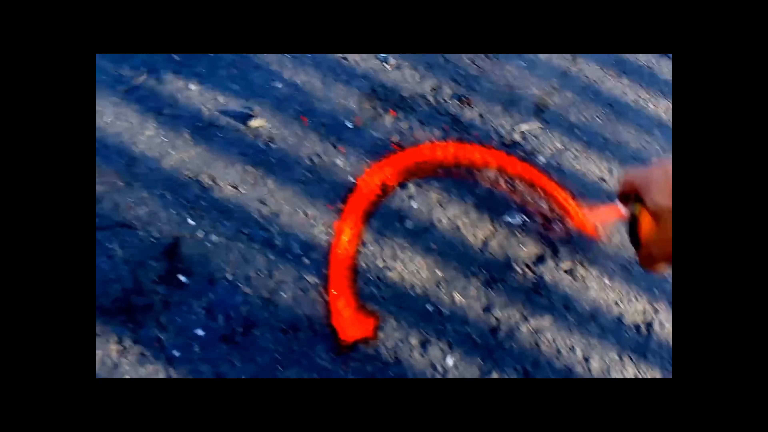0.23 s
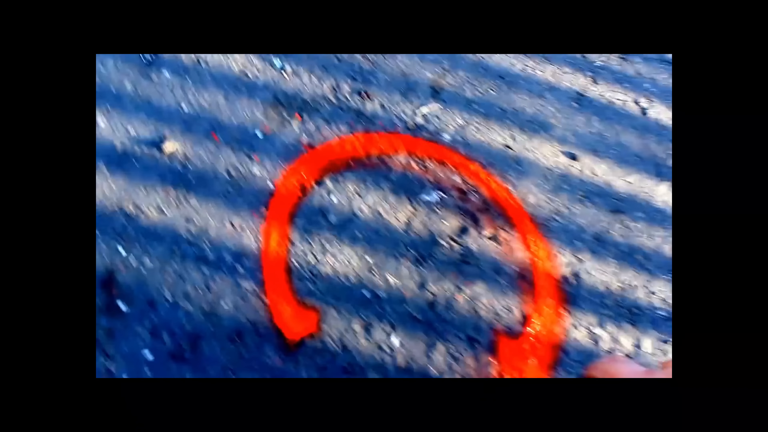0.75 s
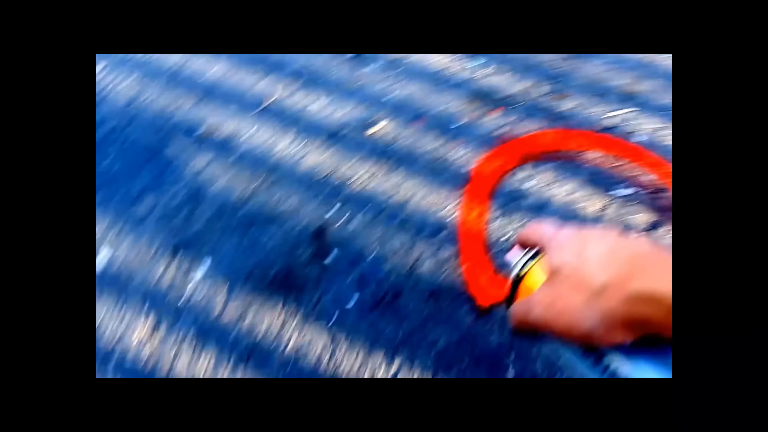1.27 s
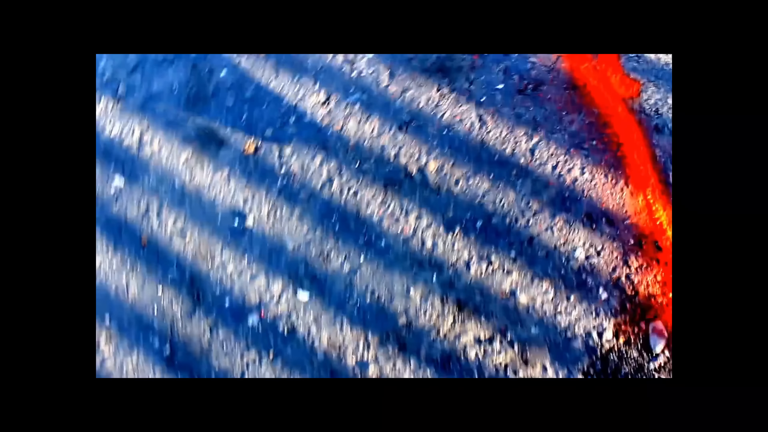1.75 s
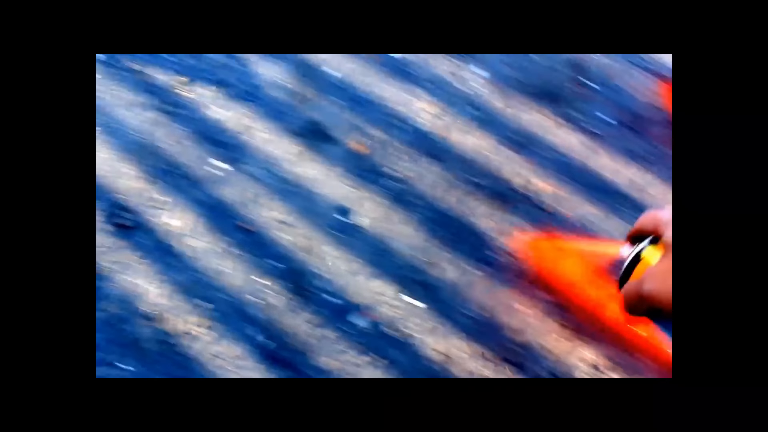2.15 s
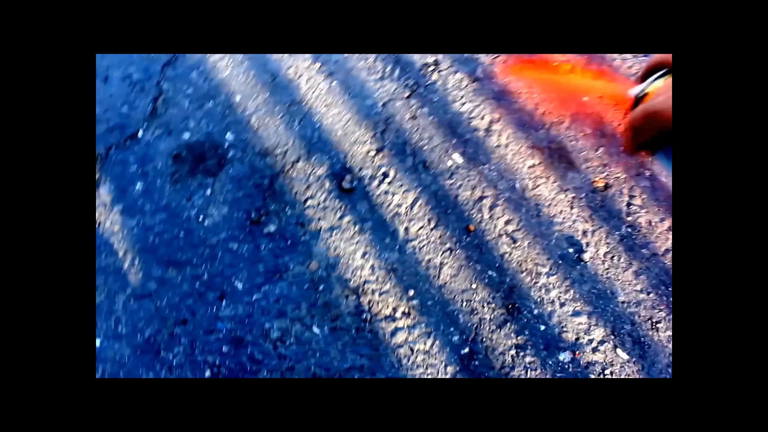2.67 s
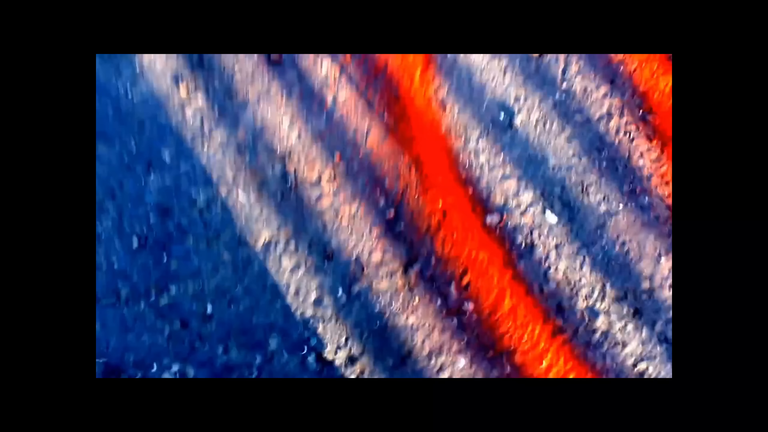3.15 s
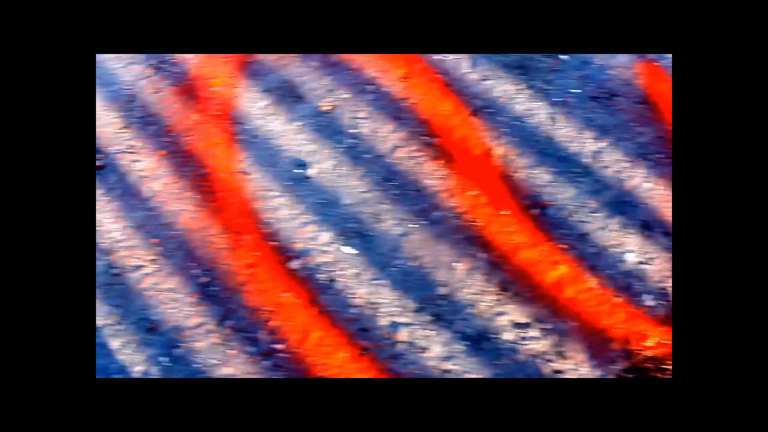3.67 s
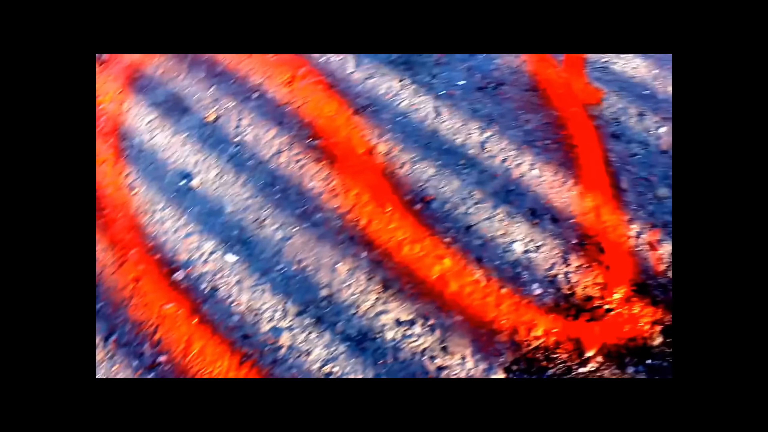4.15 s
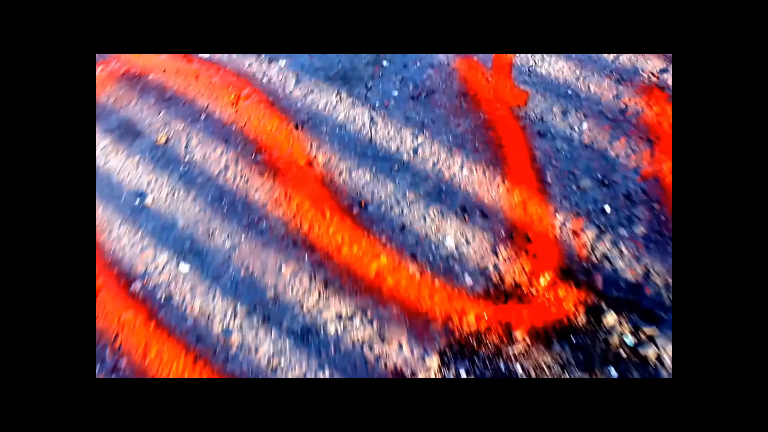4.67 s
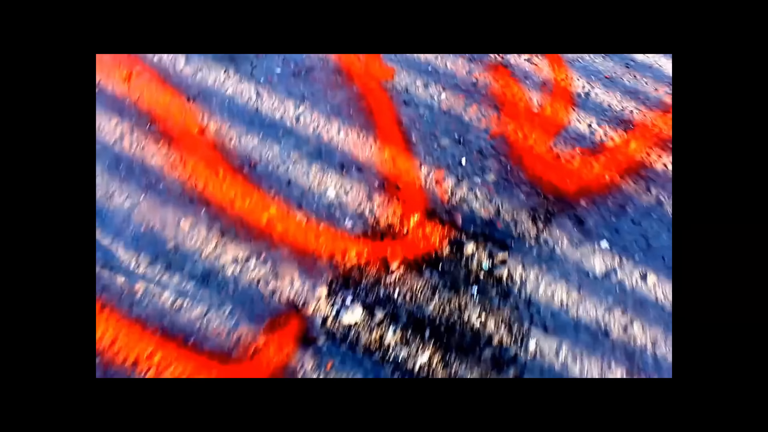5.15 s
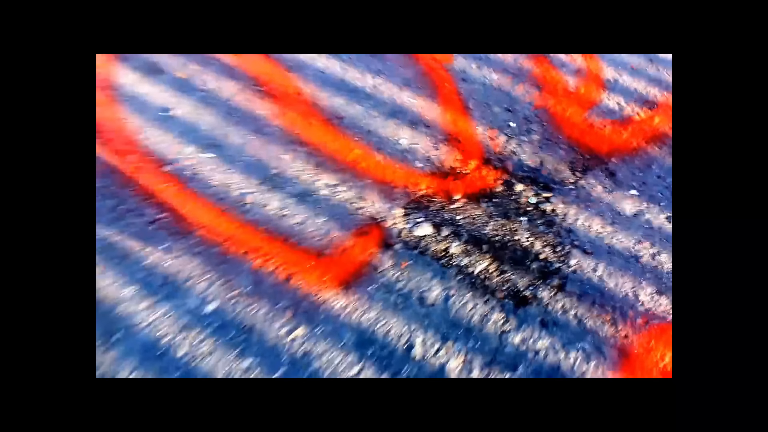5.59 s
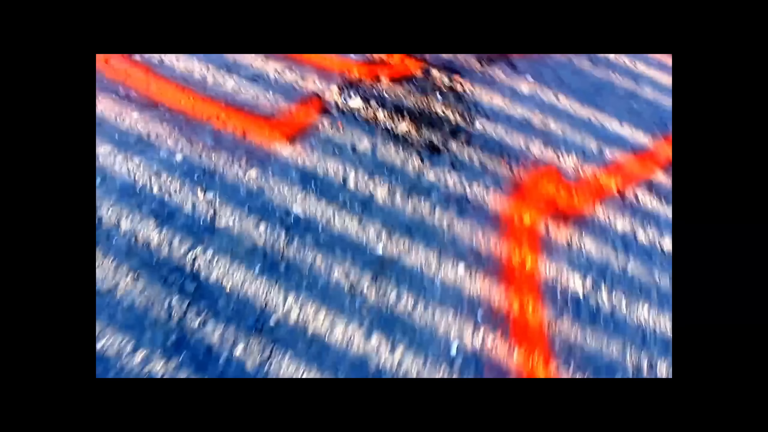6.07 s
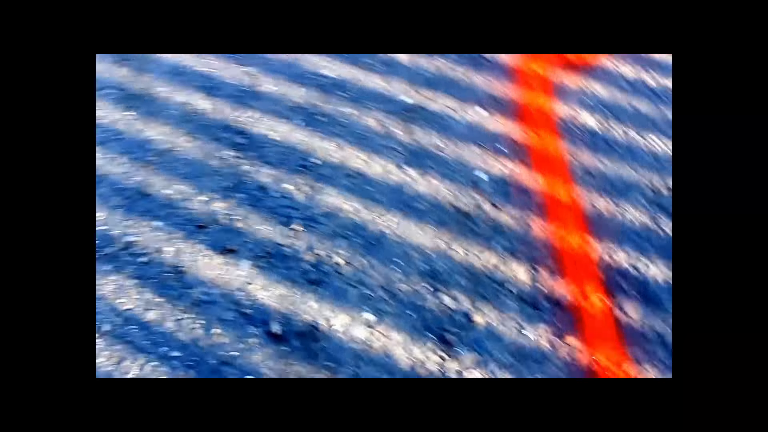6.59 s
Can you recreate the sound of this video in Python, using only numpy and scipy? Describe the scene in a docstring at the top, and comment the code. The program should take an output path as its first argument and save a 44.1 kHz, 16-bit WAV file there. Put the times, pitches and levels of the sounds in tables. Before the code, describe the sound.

An aerosol can hisses in four long bursts close to asphalt, with finger rubs, sharp ticks and hard clacks between them outdoors.

```python
"""An aerosol can sprays paint lines on asphalt in four strokes, outdoors: noise jets, gated by a valve, combed by the ground.
The first is already hissing and ends with three tiny spits; a soft airy hiss is strongest near 0.75 s, then fingers
rub and tick on the camera body. The second runs from 1.3 to 3.3 s, the third from 3.8 to 5.2 s with three hard clacks
(ringing modes) near 4.75 s. The last fades in at 5.4 s under the densest rubs and ticks (stick-slip noise and touches
through a body response), with a clack at 6.7 s. Behind it all a murmur wavers, with faint gusts near 1 and 4 s."""
import sys
import numpy as np
from scipy import signal
from scipy.fft import rfft, irfft
from scipy.io import wavfile
from scipy.ndimage import map_coordinates

SR = 44100
rng = np.random.default_rng(int(sys.argv[2]) if len(sys.argv) > 2 else 0)


def put_to_file(sound):
    """Save the sound as 16-bit audio at rate SR, in the file named by the first command-line argument."""
    columns = np.atleast_2d(sound).T  # one column per channel
    safe = np.clip(columns, -1, 1)
    whole_steps = np.round(safe * 32767)
    wavfile.write(sys.argv[1], SR, whole_steps.astype(np.int16))


N = 301203
TIME = np.arange(N) / SR


def amp(db):
    """Decibels to gain."""
    return 10 ** (np.asarray(db) / 20)


def unit(x):
    """Scales to an rms of one."""
    return x / np.sqrt(np.mean(x ** 2) + 1e-20)


def spectrum(points, hz):
    """Reads a (Hz, dB) table on a log-frequency axis."""
    table_hz, table_db = np.transpose(points)
    return np.interp(np.log(hz + 1), np.log(table_hz + 1), table_db)


def curves(rows, t=TIME):
    """Reads every column of a timed table at the times t."""
    row_s, *columns = np.transpose(rows)
    return [np.interp(t, row_s, column) for column in columns]


def add(mix, start_s, sound):
    """Mixes a sound in at start_s."""
    part = mix[max(round(start_s * SR), 0):][:len(sound)]
    part += sound[:len(part)]


def noise(points):
    """Steady noise of a given colour; rms one."""
    gain = amp(spectrum(points, np.fft.rfftfreq(N, 1 / SR)))
    return unit(irfft(rfft(rng.standard_normal(N)) * gain, N))


def flutter(hz):
    """Random wavering, up to about hz times a second; rms one."""
    rolloff = 1 + (np.fft.rfftfreq(N, 1 / SR) / hz) ** 2
    return unit(irfft(rfft(rng.standard_normal(N)) / rolloff, N))


def response(points, tilt_db=0, bass_db=0, size=2048):
    """Minimum-phase impulse response of a colour, tilted in dB per octave from 200 to 6000 Hz, bass shelved."""
    hz = abs(np.fft.fftfreq(size, 1 / SR))
    tilt = tilt_db * np.log2(np.clip(hz, 200, 6000))
    bass = bass_db / (1 + (hz / 480) ** 4)
    log_gain = np.log(amp(spectrum(points, hz) + tilt + bass))
    return np.fft.ifft(np.exp(np.conj(signal.hilbert(log_gain)))).real[:size // 2]


def through(drive, ring):
    """Lets a force ring a body, keeping its power."""
    return signal.fftconvolve(drive, ring / np.linalg.norm(ring))


def contact(grit, grit_s, size=600):
    """A sharp touch followed by a few milliseconds of gritty chatter."""
    t = np.arange(size) / SR
    return (t == 0) + grit * rng.standard_normal(size) * np.exp(-t / grit_s)


# Street's low murmur. Each row: frequency in Hz, relative density in dB per Hz.
MURMUR_COLOUR = [(20, -38), (45, -30), (95, -1), (145, -2.5), (174, 3), (205, -1.5), (380, 0), (700, -0.5),
                 (1100, -0.5), (1550, -5), (2400, -4.5), (3300, -10), (6000, -15), (16000, -66)]
MURMUR_DB = -40.5  # before its waver


def street(waver_db=2.34, waver_hz=6):
    """Distant outdoor murmur: low coloured noise, gently wavering."""
    return amp(MURMUR_DB + waver_db * flutter(waver_hz)) * noise(MURMUR_COLOUR)


# Soft airy hiss. Each row: frequency in Hz, relative density in dB per Hz.
AIRY_COLOUR = [(1000, -7.5), (2300, 1), (3300, -3.5), (4400, 4.5), (6000, 1), (7600, -3), (10000, -8),
               (11500, -13.5), (13000, -23), (16000, -34)]
# Its level over time. Each row: time in seconds, level in dB before its waver.
AIRY_LEVEL_DB = [(0, -37.5), (.75, -32.5), (1.15, -36), (3.4, -44), (5.3, -47.5), (6.8, -41.5)]


def airy_hiss(waver_db=1.5, waver_hz=3.7):
    """Soft airy hiss heard in the pauses, strongest near 0.75 s: coloured noise, gently wavering."""
    level_db, = curves(AIRY_LEVEL_DB)
    return amp(level_db + waver_db * flutter(waver_hz)) * noise(AIRY_COLOUR)


# Air moving past the microphone. Each row: frequency in Hz, relative density in dB per Hz.
WIND_COLOUR = [(10, 7.5), (30, -32), (55, 5), (90, -1), (200, -14), (1000, -70)]
# Gusts. Each row: centre in seconds, time from centre to 1/e in seconds, level in dB before its lumps.
GUSTS = [(1.07, .2, -50), (4.1, .5, -64)]


def wind(lump_db=4, lump_hz=7):
    """Faint, lumpy gusts rumble at the microphone."""
    gusts = sum(amp(db) * np.exp(-((TIME - centre_s) / half_s) ** 2) for centre_s, half_s, db in GUSTS)
    return gusts * amp(lump_db * flutter(lump_hz)) * noise(WIND_COLOUR)


# Hard clacks. Each row: start in seconds, peak in dB.
CLACKS = [(4.74, -10), (4.752, -4), (4.764, 3.5), (6.733, -11.5)]
# Their ring. Each row: frequency in Hz, start level in dB before the radiation filter, t60 in seconds.
CLACK_MODES = [(710, 2, 0.024), (1040, -10, .02), (1350, -23, .015), (1680, -7, 0.021), (2140, -7, .012),
               (2490, 10.5, 0.012), (2770, 2.5, 0.013), (3010, -16, 0.013), (2980, -11, 0.022),
               (3600, -28, 0.0089), (4560, 6, 0.018), (4800, -31, .016), (6853, -19, .016)]


def clacks(low_cut_hz=450, top_hz=6000, crack=0.11):
    """Short gritty blows: a dry crack plus quickly dying modes of something too small to radiate bass."""
    out, t = np.zeros(N), np.arange(SR // 10) / SR
    modes = sum(amp(db - 60 * t / t60_s) * np.cos(2 * np.pi * hz * t) for hz, db, t60_s in CLACK_MODES)
    radiation = signal.butter(2, [low_cut_hz, top_hz], "bandpass", fs=SR, output="sos")
    dry_crack = unit(signal.sosfilt(radiation, 1. * (t == 0)))
    ring = unit(signal.sosfilt(radiation, modes)) + crack * dry_crack
    for start_s, peak_db in CLACKS:
        clack = signal.fftconvolve(contact(grit=0.12, grit_s=0.0027), ring)
        add(out, start_s, amp(peak_db) * clack / abs(clack).max())
    return out


def friction(length_s, slips_per_s, smooth):
    """Uneven stick-slip jerks over a smooth drag; rms one."""
    n = max(round(length_s * SR), 16)
    chance, size, drag = rng.random((n, 3)).T
    slips = (chance < slips_per_s / SR) * (size - .5) * np.sqrt(SR / slips_per_s)
    return unit((slips + smooth * (drag - .5)) * signal.windows.tukey(n, .1))


# Camera body's response. Each row: frequency in Hz, gain in dB.
BODY = [(40, -36), (130, -22.5), (210, -8), (280, 0.5), (365, 3.5), (520, -2), (670, 0), (800, 4.5),
        (1300, -3), (1640, -2.5), (2000, -4.5), (4400, -11), (6000, -16), (16000, -38)]
LANDING_BASS_DB, LEAVING_BASS_DB = 8.5, -6.5  # a finger lands with a fleshy thump and leaves thinner
UNEVEN_DB, UNEVEN_S = 2, .006  # finger pressure wavers this much, this quickly
LIFT_S = .008


def rub(length_s, swell_s, db, fade_db, tilt_db, bass_db):
    """A finger presses in unevenly, eases off and lifts; the body's sound loses bass along the way."""
    drive = friction(length_s, slips_per_s=450, smooth=0.94)
    t = np.arange(len(drive)) / SR
    waver = rng.standard_normal(size=64)
    pressure_db = UNEVEN_DB * np.interp(t / UNEVEN_S, np.arange(len(waver)), waver)
    drive = unit(drive * amp(pressure_db))
    eased = np.clip((t - swell_s) / max(length_s - swell_s, 1 / SR), 0, 1)
    press = np.minimum(t / swell_s, 1)
    lift = np.minimum((length_s - t) / LIFT_S, 1)
    drive = drive * press * lift * amp(db - fade_db * eased ** 1.6)
    landing = response(BODY, tilt_db, bass_db + LANDING_BASS_DB)
    leaving = response(BODY, tilt_db, bass_db + LEAVING_BASS_DB)
    return through(drive * (1 - t / length_s), landing) + through(drive * t / length_s, leaving)


# Finger rubs. Each row: start in seconds, length in seconds, swell time in seconds,
# level in dB before swell and fade, fade in dB, brightness in dB per octave,
# bass in dB before landing and leaving shifts.
RUBS = [(0.811, 0.053, .008, -33.5, -1, 2, 12), (0.882, 0.13, 0.029, -17.5, 10.5, -1.5, -3.5),
        (1.412, 0.034, .004, -30.5, 8, -.5, 7), (1.472, 0.019, 0.0037, -32, -4, 0, 1),
        (1.553, 0.096, 0.026, -22.5, 7.5, -1, 7), (3.072, 0.1135, 0.054, -31, 1, -5, -1),
        (4.731, 0.056, .003, -27, 3, 2, 1), (4.818, 0.026, 0.01, -16, -1, -1.5, -10),
        (4.844, .11, 0.0027, -22, 6, -0.5, -3.5), (5.186, .088, 0.017, -22, 4.5, -8.5, -13.5),
        (5.309, 0.099, 0.0044, -20.5, 7, -6, -6), (5.725, 0.018, 0.0027, -20, 21, -4.5, 21),
        (5.831, 0.054, .002, -17, 7, 3, 12), (5.876, 0.066, 0.0018, -18, 7, 1, 6.5),
        (6.089, 0.045, 0.011, -28, 5, -9, -7), (6.178, 0.08, .003, -19.5, 9.5, -1, 3),
        (6.671, 0.11, .004, -26, 9.5, -1.5, -20)]
# Thin scratches. Each row: start in seconds, length in seconds, level in dB.
SCRATCHES = [(4.827, 0.014, -30), (5.338, 0.0024, -26.5), (5.356, 0.034, -39), (5.368, 0.0068, -21.5),
             (5.377, 0.0033, -21)]
# Their colour. Each row: frequency in Hz, relative gain in dB.
SCRATCH_COLOUR = [(1000, -12), (3500, -4), (5800, 1.5), (7800, 5.5), (9200, -1.5), (10500, -15),
                  (16000, -25)]
# Single ticks and knocks. Each row: start in seconds, peak in dB, brightness in dB per octave.
TICKS = [(.827, -12.5, 13), (0.961, -13, -1.5), (1.4164, -6, 1), (1.559, -19, -8), (3.613, -25, 1),
         (4.809, -13, -5), (4.859, -15, -10), (4.908, -6.5, 6), (4.9407, -7.5, -1.5), (5.341, -22, 0),
         (5.729, -8, 1), (5.833, 2.5, 2), (5.85, -3, 0), (5.862, -6, 0.5), (5.879, -9, -4.5),
         (6.182, -10, -8), (6.673, -8, 0), (6.6902, 4, 6), (6.699, -6.5, 3.5), (6.713, -7, 3)]


def fingers():
    """Rubs and scratches (stick-slip friction) and ticks (single touches) on the camera body."""
    out = np.zeros(N)
    for start_s, *shape in RUBS:
        add(out, start_s, rub(*shape))
    for start_s, length_s, db in SCRATCHES:
        drive = friction(length_s, slips_per_s=4100, smooth=.8)
        add(out, start_s, amp(db) * through(drive, response(SCRATCH_COLOUR)))
    for start_s, peak_db, tilt_db in TICKS:
        tick = signal.fftconvolve(contact(grit=0.16, grit_s=0.0011), response(BODY, tilt_db))
        add(out, start_s, -amp(peak_db) * tick / abs(tick).max())
    return out


# Drops spat as the valve closes. Each row: start in seconds, peak in dB before the ground reflections.
SPITS = [(.6814, -20), (.7042, -18), (0.7162, -13.5)]
# Jet's hiss, also the spits' colour. Each row: frequency in Hz, relative density in dB per Hz.
HISS_COLOUR = [(500, -15), (2000, -26), (3300, 0.5), (4500, 1.5), (6300, 4), (7600, 1.5), (9000, -0.5),
               (10500, -12), (16000, -10.5)]


def spits():
    """Each last drop leaves the nozzle with a tiny bright snap."""
    out, snap = np.zeros(N), response(HISS_COLOUR)
    for start_s, peak_db in SPITS:
        add(out, start_s, amp(peak_db) * snap / abs(snap).max())
    return out


def fuzzy_tone(hz, width_hz):
    """Turbulence in a resonance whose centre follows the curve hz; rms one."""
    radius = np.exp(-np.pi * width_hz / SR)
    turbulence = rng.standard_normal(N) + 1j * rng.standard_normal(N)
    swirl = signal.lfilter([1], np.poly([radius, radius]), turbulence)
    return unit((swirl * np.exp(2j * np.pi * np.cumsum(hz) / SR)).real)


def ringing(colour, hz, db, width_hz):
    """Broad noise with part of its power gathered in a moving resonance; rms about one."""
    return (noise(colour) + amp(db) * fuzzy_tone(hz, width_hz)) / np.hypot(1, amp(db))


# Valve presses, one per stroke. Each row: half open in seconds, half closed in seconds,
# rise time in seconds, fall time in seconds.
PRESSES = [(-.1, 0.716, .02, 0.09), (1.317, 3.329, 0.038, 0.024), (3.782, 5.229, 0.032, 0.053),
           (5.386, 6.84, 0.18, 0.21)]


def held(per_stroke):
    """Spreads per-stroke values over time: each holds until the next press."""
    opens_s = np.transpose(PRESSES)[0]
    return np.array(per_stroke)[np.searchsorted(opens_s[1:], TIME)].T


# Ground reflection, set by the can's height, one list per stroke. Each row: time in seconds, delay in ms.
HEIGHTS = [
    [(0, .708), (.15, .712), (.3, .776), (.65, .804)],
    [(1.4, .337), (1.85, .482), (2.15, .449), (2.33, .467), (2.6, .585), (2.72, .598), (3.0, .492),
     (3.3, .42)],
    [(3.8, .47), (3.9, .416), (4.06, .386), (4.38, .462), (5.05, .515)],
    [(5.5, .498), (5.76, .57), (6.02, .577), (6.38, .478), (6.62, .549)],
]


def reflection_delay_ms():
    """The extra path via the ground, as a delay following the can's height."""
    return curves(np.vstack(HEIGHTS))[0]


# Jet as the can swings, one list per stroke. Each row: time in seconds, level in dB, brightness in dB.
JET = [
    [(0.0, -32, 0.5), (0.12, -33, 4.5), (0.18, -32.5, -1.5), (0.42, -29, -4), (0.62, -31, 0),
     (0.67, -36, 2)],
    [(1.35, -35, 0.9), (1.41, -33, 4.5), (1.59, -32, 0.5), (1.67, -34.5, 0.5), (1.91, -28.5, -2),
     (2.43, -32.5, 1.8), (2.53, -33.5, -2), (2.59, -32, 0), (2.79, -31.5, 2.5), (3.15, -24.5, -5),
     (3.29, -29.5, -2)],
    [(3.82, -35.5, -0.8), (4.16, -34.5, -0.1), (4.66, -38.5, -0.5), (4.79, -39, -2), (4.97, -35.5, -2),
     (5.07, -28.5, -2.7), (5.18, -27.5, -7)],
    [(5.45, -30, -4.4), (5.51, -29, -3.5), (5.73, -29, -2), (5.96, -35.5, -3), (6.08, -30.2, -6.1),
     (6.66, -36.5, -3.5), (6.81, -45.5, 7)],
]
# Splash on the asphalt. Each row: frequency in Hz, relative density in dB per Hz.
SPLASH_COLOUR = [(150, -34.5), (600, -21), (1100, 2), (1700, 2), (2400, 3), (3600, 4.5), (4800, -14.5),
                 (8000, -16.5), (16000, -45)]
# Nozzle fizz. Each row: frequency in Hz, relative density in dB per Hz.
FIZZ_COLOUR = [(3000, -33), (8000, -5), (9800, 2.5), (10800, 2.5), (11900, -0.5), (12800, 2.5), (14000, -3),
               (15800, -6)]
# How the can is held. Each row: splash in dB at the usual jet level, hollow ring in cycles per reflection delay,
# hollow ring in dB re splash noise, whistle in Hz, whistle in dB re fizz noise.
AIMS = [(-38, 2.55, -11, 12000, -8), (-36.6, .96, -11, 11300, -4.5), (-33.5, 1.02, -6, 11700, -6),
        (-33, .92, -8, 11600, -3.5)]
HISS_DB, FIZZ_DB = -1.22, -0.3  # re jet level; brightness adds to the fizz
SPLASH_FOLLOWS, USUAL_JET_DB = 0.48, -31.5  # splash takes this share of the jet's swings in dB
HOLLOW_WIDTH_HZ, WHISTLE_WIDTH_HZ = 620, 1300


def spray(flutter_db=0.95, flutter_hz=60, spit_db=0.65, spit_hz=500, splash_waver_db=1.5, splash_waver_hz=6):
    """A turbulent jet leaves the nozzle and splashes on the asphalt while the valve is down."""
    valve = sum(np.clip(np.minimum((TIME - on_s) / rise_s, (off_s - TIME) / fall_s) + .5, 0, 1)
                for on_s, off_s, rise_s, fall_s in PRESSES)
    level_db, bright_db = curves(np.vstack(JET))
    splash_db, cycles, hollow_db, whistle_hz, whistle_db = held(AIMS)
    splash_db = splash_db + SPLASH_FOLLOWS * (level_db - USUAL_JET_DB)
    splash_db = splash_db + splash_waver_db * flutter(splash_waver_hz)
    # the space between can, hand and ground rings lower as the can rises
    hollow_hz = 1000 * cycles / reflection_delay_ms()
    splash = amp(splash_db) * ringing(SPLASH_COLOUR, hollow_hz, hollow_db, HOLLOW_WIDTH_HZ)
    hiss = amp(level_db + HISS_DB) * noise(HISS_COLOUR)
    fizz_noise = ringing(FIZZ_COLOUR, whistle_hz, whistle_db, WHISTLE_WIDTH_HZ)
    fizz = amp(level_db + bright_db + FIZZ_DB) * fizz_noise
    # paint and gas leave the nozzle slightly unevenly
    uneven_db = flutter_db * flutter(flutter_hz) + spit_db * flutter(spit_hz)
    return valve * (splash + hiss + fizz) * amp(uneven_db)


# Rough asphalt mirrors the middle and scatters the top. Each row: frequency in Hz, gain in dB.
MIRROR = [(500, 2), (1500, 4.5), (3000, 4), (6000, 1.5), (9000, .5), (12000, .5), (15000, -6)]
# One value per stroke: reflection gain at the usual delay; negative swaps the comb's peaks and notches.
ECHOES = [-.15, .39, .29, .37]
USUAL_DELAY_MS, ECHO_GROWTH = .5, 1.1  # reflection grows as this power of the delay


def ground(x, second_bounce=0.069):
    """Reflections between asphalt and hand comb the hiss; the comb slides with the height of the can."""
    delay_ms = reflection_delay_ms()
    strength = held(ECHOES) * (delay_ms / USUAL_DELAY_MS) ** ECHO_GROWTH
    mirror_gain = amp(spectrum(MIRROR, np.fft.rfftfreq(N, 1 / SR)))
    read_at = np.arange(N) - delay_ms * SR / 1000

    def reflect(sound):
        """One trip to the ground and back."""
        mirrored = irfft(rfft(sound) * mirror_gain, N)
        return strength * map_coordinates(mirrored, [read_at], order=3, mode="mirror")

    echo = reflect(x)
    return (x + echo + second_bounce * reflect(echo)) / np.sqrt(1 + strength ** 2)


def scene():
    """Everything meets at one microphone, the same in both channels."""
    background = street() + airy_hiss() + wind()
    mono = background + clacks() + fingers() + ground(spits() + spray())
    return np.array([mono, mono])


LIMIT, CUTOFF_HZ = .85, 15850


def record(dry):
    """Hard clipping at the limit, then a steep low-pass."""
    low_pass = signal.firwin(511, CUTOFF_HZ, window=("kaiser", 9), fs=SR)
    return signal.oaconvolve(np.clip(dry, -LIMIT, LIMIT), low_pass[None], "same", axes=1)


dry = scene()
out = record(dry)
put_to_file(out)
```